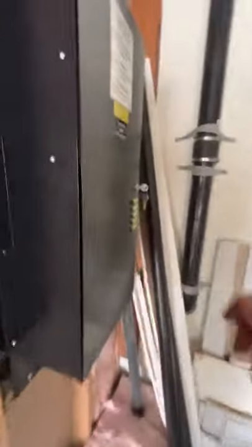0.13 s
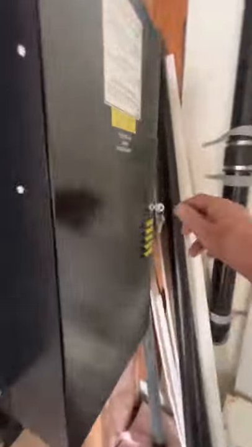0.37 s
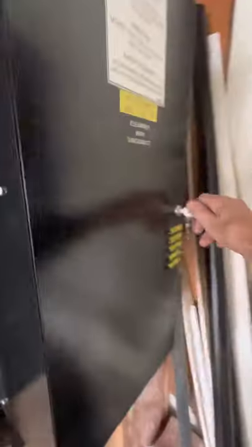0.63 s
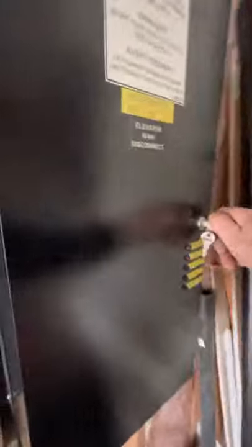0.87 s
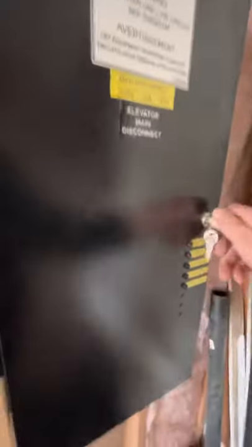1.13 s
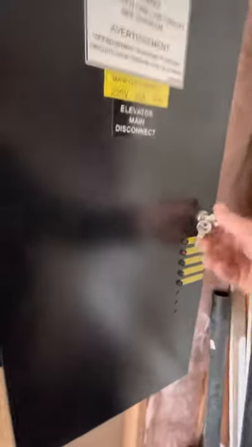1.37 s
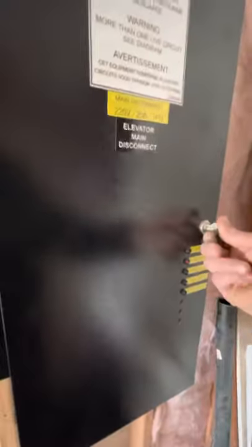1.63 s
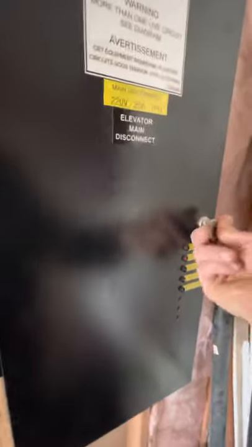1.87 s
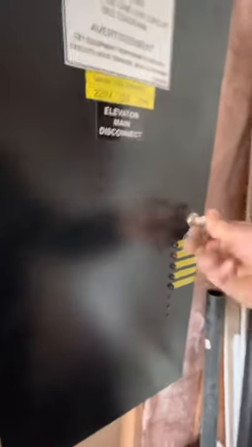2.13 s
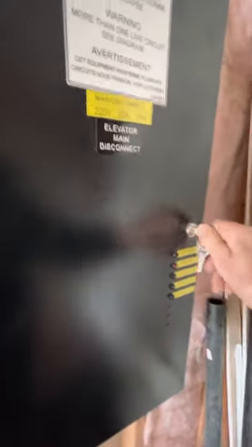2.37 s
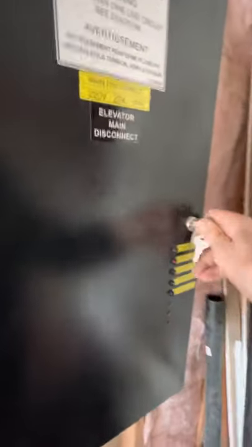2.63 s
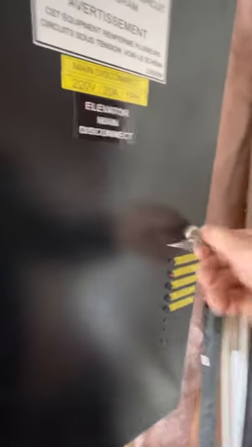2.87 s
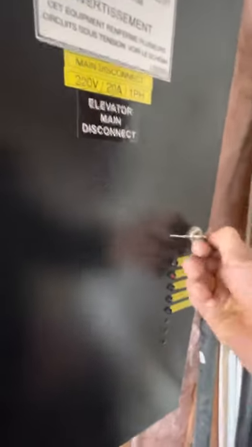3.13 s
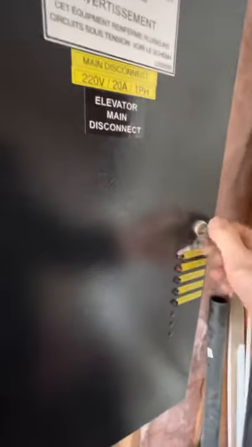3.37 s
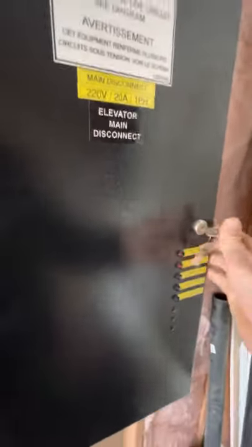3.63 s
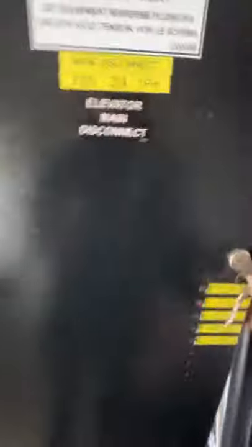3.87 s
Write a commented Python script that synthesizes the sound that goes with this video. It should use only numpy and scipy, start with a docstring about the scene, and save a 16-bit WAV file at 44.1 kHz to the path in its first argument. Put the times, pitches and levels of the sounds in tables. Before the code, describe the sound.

A key works a metal cabinet lock, close up in a bare room with faint low rumble. After near quiet, a soft rustle and small clicks begin around 0.5 s, with light ticks and jiggling until 2.6. A sharp clack at 2.7 leads to a loud one at 2.9; more clacks follow at 3.3. From 3.67 to 3.9 a dense, loudest burst rattles and booms the hollow panel.

```python
"""A key worked by hand in the lock of a sheet-metal cabinet door, bare room, microphone with two ports.
Key and latch click and chatter as bands of noise that rattle and die away; resonators ring the keys.
The door panel booms as pushes and contacts set its low modes ringing.
Underneath lie a rustle of movement, made of swelling noise bands, and a low, patchy room rumble.
No distances are set apart: every source goes through the same two ports."""
import sys
import numpy as np
from scipy import signal
from scipy.fft import rfft, irfft
from scipy.io import wavfile
from scipy.ndimage import uniform_filter1d

SR = 44100
rng = np.random.default_rng(int(sys.argv[2]) if len(sys.argv) > 2 else 0)


def digitize_waveform(pressure):
    """Quantize a signal to 16-bit integers and store it at the path in sys.argv[1].

    Rows of a 2-D input are taken as channels; values are limited to [-1, 1].
    """
    field = np.atleast_2d(pressure).T
    bounded = np.clip(field, -1, 1)
    quanta = np.round(bounded * 32767).astype(np.int16)
    wavfile.write(sys.argv[1], SR, quanta)


def amplitude_ratio(level_db):
    """Convert a level in decibels to the matching linear amplitude (field) ratio."""
    exponent = np.asarray(level_db, float) / 20
    return 10 ** exponent


N = 176400

# metal contacts of key, lock and latch: start_s, level_db, dullness_db (lows re mids)
CONTACT_EVENTS = [(0.5216, -41, -5), (0.675, -54.5, -20), (0.724, -33, -4.5), (0.9435, -36, -12),
                  (1.1384, -41.5, -6.5), (1.382, -44.5, -9), (1.4192, -34.5, -16.5), (1.4413, -34, -1),
                  (1.4853, -32.5, -7), (1.908, -54, 9.5), (1.981, -44.5, -6), (2.0369, -43.5, 1.5),
                  (2.1248, -39, -4), (2.166, -42, -6), (2.2278, -36, -10), (2.2994, -41.5, -5),
                  (2.4054, -45, 1), (2.6016, -42, -5.5), (2.695, -38.5, 2.5), (2.7155, -18, -0.5),
                  (2.815, -28, -10.5), (2.8918, -6.5, -11.5), (2.9205, -11, -9.5), (2.9892, -28, -20.5),
                  (3.1153, -38.5, 1.5), (3.2824, -17, -11.5), (3.3264, -15, -11), (3.3596, -25, -16),
                  (3.42, -22, -9.5), (3.472, -29.5, -9.5), (3.536, -46, -12.5), (3.5772, -34, -4),
                  (3.616, -32, -6), (3.671, -12.5, -2), (3.686, -3.5, -12), (3.731, -8, -12),
                  (3.7834, -9, -10.5), (3.805, -15, -7.5), (3.866, -21.5, -3), (3.9167, -20, -4.5)]
# chatter spectrum: band_hz, level_db (per Hz)
CHATTER_TONE = [(300, -2.5), (900, -1), (6000, -5), (11500, -7), (15000, -31)]
CHATTER_T60_S, CHATTER_ROUGH_DB, CHATTER_DB = 0.093, 2.5, -9
CHATTER_RISE_S = .0008  # scale of the quick rise; its time constant is 1.45 times this
CHATTER_LOUD_S_PER_DB = .0003  # first to last touch, per dB above -40: harder contacts peak later
USUAL_DULL_DB, DULL_TREBLE_LOSS = -8.5, 1  # a duller contact also loses highs
COLOUR_SPREAD_DB = 2.5  # each contact excites each band differently
SHEET_PEAKS_DB, SHEET_PEAK_HZ = 3.5, 30  # many close modes of sheet metal: spread, width of the peaks
# dense ringing of sheet and room after a contact: band_hz, t60_s
WASH_DECAY = [(300, 0.61), (3000, 0.29), (14000, 0.13)]
WASH_DB = -3  # re the power that feeds the chatter
# resonances of keys and lock: pitch_hz, level_db (of the noise that drives them), t60_s
KEY_MODES = [(378.4, -41, 0.066), (800, -47.5, 0.046), (1078, -47.5, 0.076), (5610, -26, 0.0044),
             (10990, -25.5, 0.0055)]
KEYS_SPREAD_DB = 3
JINGLE_PER_DB = .25  # loose keys stand out in light contacts: dB gained per dB of lightness

# pushes on the door panel: start_s, level_db, favoured_hz
DOOR_PUSHES = [(0.744, -25, 146), (0.824, -36.5, 152), (1.889, -33.5, 109), (2.048, -32.5, 112),
               (2.586, -29, 113), (2.716, -21.5, 335), (2.801, -22.5, 268), (2.832, -17.5, 112),
               (2.942, -19.5, 74), (3.509, -29, 110), (3.671, -12, 168), (3.757, -19.5, 308),
               (3.818, -18, 117), (3.918, -20.5, 350)]
# modes of the door panel: pitch_hz, level_db
DOOR_MODES = [(67, -4), (112, -3.5), (127, -5.5), (160, -5), (235, -4.5), (280, -8), (372, -11.5)]
DOOR_T60_CYCLES, DOOR_T60_S = 15, .12  # decay time: some cycles plus a fixed part
PUSH_S = 0.00392  # spread of the random delay before each mode starts
PUSH_OCTAVE_LOSS_DB, DOOR_SPREAD_DB = 13, 3
CONTACT_SHAKE_DB = -1  # contacts also shake the panel, as much as they are dull

# rustle of movement: time_s, level_db
RUSTLE_LEVEL = [(0, -50.5), (.41, -51), (.45, -59), (.52, -54), (0.572, -36), (.66, -49), (.8, -59),
                (1.05, -47.5), (1.22, -59), (1.36, -55), (1.491, -37.5), (1.58, -72), (1.802, -62),
                (2.671, -60.5), (2.75, -46), (3.2, -57.5), (3.36, -43.5), (4, -59)]
# rustle spectrum: band_hz, level_db (per Hz)
RUSTLE_SPECTRUM = [(300, 4.5), (2000, 1), (7000, -2.5), (11500, -9)]
RUSTLE_BRIGHTENS = 0.21  # dB per octave above 2 kHz, for each dB of level
RUB_HZ, RUB_T60_S, RUB_DB = 2080, 0.014, -29  # resonance in the rubbing; level of its drive re the rustle

# room rumble spectrum: band_hz, level_db (per Hz)
RUMBLE_TONE = [(30, -4), (120, -1), (543, -19.5), (1070, -23.5), (1800, -61)]
RUMBLE_DB, RUMBLE_PATCHY_DB = -50, 6.5  # rms ahead of the microphone, spread of the patches

# phase between the two microphone ports: band_hz, left_lead_rad
PORT_LEAD = [(3000, 0), (5000, .3), (7600, 2.5), (10200, 3.3), (10800, 5.6), (14000, 7.2)]
# share common to both ports: band_hz, likeness (0 to 1)
PORT_LIKENESS = [(300, 0.92), (800, 0.44), (8000, 0.65)]
# level between the ports: band_hz, left_minus_right_db
PORT_LEAN = [(100, 1.3), (600, 3.1), (5000, -.3)]
# microphone colour: band_hz, level_db
MIC_COLOUR = [(25, -9), (50, 0.5), (10300, -4.5), (11700, -8.5), (12900, -11.5), (16000, -35)]


def contact_colour_db(hz):
    """Dull contacts gain lows below 2 kHz and lose highs above 3 kHz."""
    dull_db = np.transpose(CONTACT_EVENTS)[2]
    low_gain = np.clip(np.log2(2000 / hz), 0, 1)
    high_loss = DULL_TREBLE_LOSS * np.clip(np.log2(hz / 3000), 0, 1)
    return (low_gain - high_loss) * (dull_db - USUAL_DULL_DB)


def touch_power(level_db):
    """Each contact feeds in power by three touches, spread wider the harder it is."""
    s, db, _ = np.transpose(CONTACT_EVENTS)
    step = CHATTER_LOUD_S_PER_DB * np.clip(db + 40, 0, 40) / 2
    times = np.concatenate([s, s + step, s + 2 * step])
    touches = train(times, np.tile(amplitude_ratio(2 * (db + level_db)), 3))
    return die(touches, 10 * CHATTER_RISE_S) / (CHATTER_RISE_S * SR)


def contacts():
    """Metal touches excite noise bands: a rough dying rattle plus a wash that decays by band."""
    together, out = drift(230), 0  # roughness shared by all bands
    for hz, noise in bands(319.8, count=12, peaks_db=SHEET_PEAKS_DB):
        chance_db = COLOUR_SPREAD_DB * rng.standard_normal(len(CONTACT_EVENTS))
        level_db = CHATTER_DB + at_hz(CHATTER_TONE, hz) + contact_colour_db(hz) + chance_db
        power = touch_power(level_db)
        # the root of a power halves its decay in dB, hence t60 / 2
        rough = amplitude_ratio(CHATTER_ROUGH_DB * (together + drift(200)))
        rattle = rough * np.sqrt(die(power, CHATTER_T60_S / 2))
        wash = amplitude_ratio(WASH_DB) * np.sqrt(die(power, at_hz(WASH_DECAY, hz) / 2))
        out = out + noise * (rattle + wash)
    return out


def keys():
    """The noisy rattle of the contacts drives short resonances of keys and lock."""
    db = np.transpose(CONTACT_EVENTS)[1]
    jingle_db, out = JINGLE_PER_DB * (db.mean() - db), 0
    for hz, level_db, t60 in KEY_MODES:
        chance_db = KEYS_SPREAD_DB * rng.standard_normal(len(db))
        drive_db = level_db + contact_colour_db(hz) + jingle_db * (hz > 3000) + chance_db
        rattle = np.sqrt(die(touch_power(drive_db), CHATTER_T60_S / 2))
        out = out + ring(rattle * rng.standard_normal((2, N)), hz, t60)
    return out


def door():
    """A soft push swells panel modes near its own pitch over two cycles; contacts tap all modes."""
    s, db, favoured_hz = np.transpose(DOOR_PUSHES)
    tap_s, tap_db, dull_db = np.transpose(CONTACT_EVENTS)
    out = 0
    for hz, level_db in DOOR_MODES:
        off_pitch_db = PUSH_OCTAVE_LOSS_DB * abs(np.log2(hz / favoured_hz))
        chance_db = DOOR_SPREAD_DB * rng.standard_normal(len(s))
        size = amplitude_ratio(db + level_db - off_pitch_db + chance_db)
        first = s + PUSH_S * abs(rng.standard_normal(len(s)))
        pushed = train(np.r_[first, first + 1 / hz], np.tile(size, 2))
        tap_size = amplitude_ratio(tap_db + dull_db + level_db + CONTACT_SHAKE_DB)
        tapped = train(tap_s, tap_size * rng.standard_normal(len(tap_s)))
        out = out + ring(pushed + tapped, hz, DOOR_T60_S + DOOR_T60_CYCLES / hz)
    soft = signal.sosfilt(signal.butter(2, 700, fs=SR, output="sos"), out)
    return np.array([soft, 0 * soft])  # the panel is wholly common to both ports


def rustle():
    """Grainy rubbing swells and fades with movement, brighter when louder, with one resonance."""
    s, db = np.transpose(RUSTLE_LEVEL)
    db = np.interp(np.arange(N) / SR, s, db)
    hiss = 0
    for hz, noise in bands(317, count=12):
        bright_db = RUSTLE_BRIGHTENS * (db - db.mean()) * np.log2(max(hz / 2000, 1))
        grain_db = 2.0 * drift(65)
        hiss = hiss + amplitude_ratio(db + at_hz(RUSTLE_SPECTRUM, hz) + bright_db + grain_db) * noise
    rub = amplitude_ratio(db + RUB_DB) * rng.standard_normal((2, N))
    return hiss + ring(rub, RUB_HZ, RUB_T60_S)


def rumble():
    """Low room noise whose bands drift in level independently."""
    out = 0
    for hz, noise in bands(28.0, count=13):
        out = out + amplitude_ratio(at_hz(RUMBLE_TONE, hz) + RUMBLE_PATCHY_DB * drift(5.2)) * noise
    return amplitude_ratio(RUMBLE_DB) * rms_one(out)


def rms_one(x):
    """Scale to rms 1."""
    return x / np.sqrt(np.mean(x ** 2) + 1e-20)


def at_hz(points, hz):
    """Read a table on a log-frequency axis."""
    table_hz, value = np.transpose(points)
    return np.interp(np.log(hz), np.log(table_hz), value)


def drift(rate):
    """Slow random wander of rms 1: noise through two equal low-pass poles at rate (Hz)."""
    r = np.exp(-2 * np.pi * rate / SR)
    settled = signal.lfilter([1], [1, -2 * r, r * r], rng.standard_normal(N + SR))[SR:]
    return rms_one(settled)


def train(s, sizes):
    """Clicks at given times (s)."""
    out = np.full(N, 1e-18)
    np.add.at(out, (np.asarray(s) * SR).astype(int), sizes)
    return out


def die(clicks, t60):
    """Each click starts an exponential decay of 60 dB in t60 (s)."""
    return signal.lfilter([1], [1, -amplitude_ratio(-60 / (abs(t60) * SR))], clicks)


def ring(clicks, hz, t60):
    """A two-pole resonator: a unit click sets a decaying sine of height 1 ringing."""
    r, w = amplitude_ratio(-60 / (abs(t60) * SR)), 2 * np.pi * hz / SR
    return signal.lfilter([0, np.sin(w)], [1, -2 * r * np.cos(w), r * r], clicks)


def bands(low_hz, count, peaks_db=0):
    """Half-octave noise bands as (centre Hz, two unrelated rows), with fine random peaks if asked."""
    white = rfft(rng.standard_normal((2, 2, N)))
    peak_bins = max(int(SHEET_PEAK_HZ * N / SR), 1)
    peaks = rms_one(uniform_filter1d(rng.standard_normal(N // 2 + 1), peak_bins))
    white = rms_one(irfft(white * amplitude_ratio(peaks_db * peaks), N))
    for k in range(count):
        low = low_hz * 2 ** (k / 2)
        high = min(low * 2 ** .5, .45 * SR)
        band = signal.butter(2, [low, high], "band", fs=SR, output="sos")
        yield np.sqrt(low * high), signal.sosfilt(band, white[k % 2])  # neighbours use unrelated noise


def scene():
    """Two rows: the sound common to both ports, and an unrelated twin for their difference."""
    return contacts() + keys() + door() + rustle() + rumble()


def roll_off(x):
    """The treble ends steeply here."""
    return signal.sosfilt(signal.butter(12, 16620, fs=SR, output="sos"), x)


def record(dry):
    """The ports share the sound by band and differ in level and phase; peaks are rounded."""
    hz = np.maximum(np.arange(N // 2 + 1) * SR / N, 1)
    common, twin = rfft(dry, axis=1) * amplitude_ratio(at_hz(MIC_COLOUR, hz))
    alike = np.clip(at_hz(PORT_LIKENESS, hz), 0, 1)
    mid = np.sqrt((1 + alike) / 2) * common
    side = np.sqrt((1 - alike) / 2) * twin
    # half of the level and phase difference goes to each port
    turn = amplitude_ratio(at_hz(PORT_LEAN, hz) / 2) * np.exp(.5j * at_hz(PORT_LEAD, hz))
    ports = irfft(np.array([(mid + side) * turn, (mid - side) / turn]), N, axis=1)
    return roll_off(np.tanh(ports))


dry = scene()
out = record(dry)
digitize_waveform(out)
```